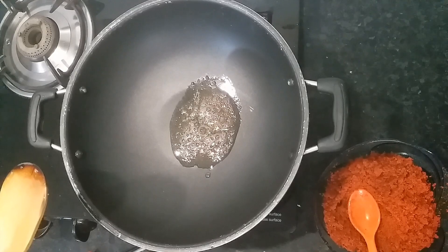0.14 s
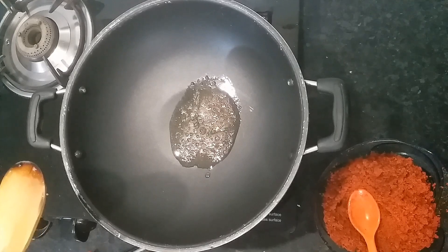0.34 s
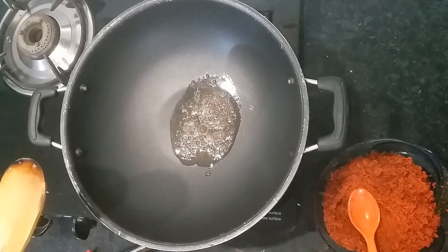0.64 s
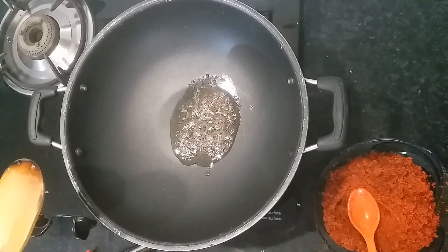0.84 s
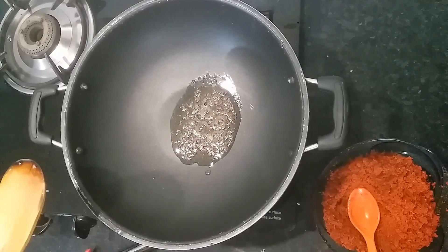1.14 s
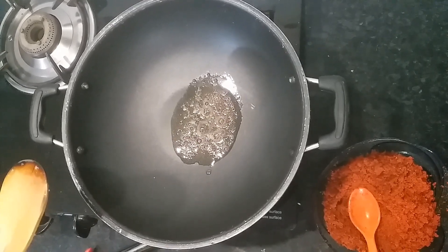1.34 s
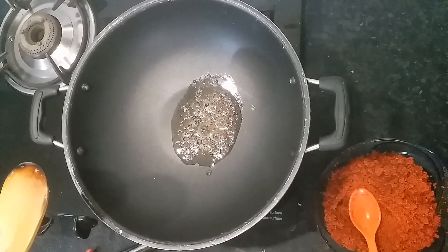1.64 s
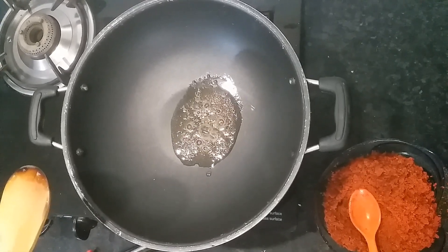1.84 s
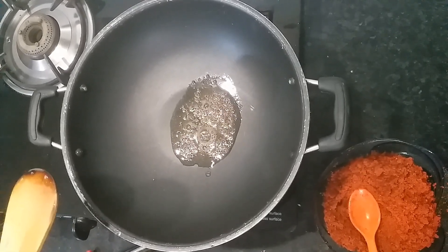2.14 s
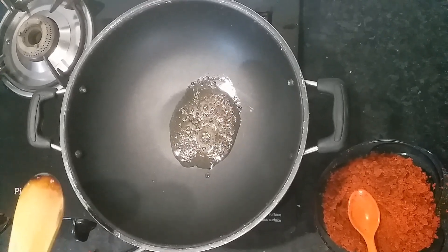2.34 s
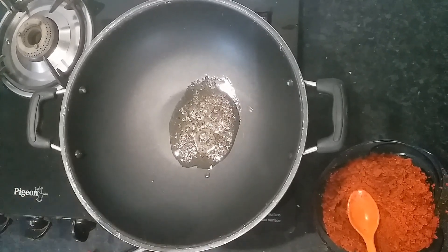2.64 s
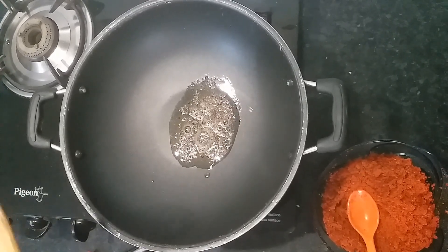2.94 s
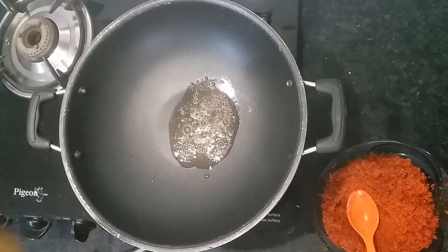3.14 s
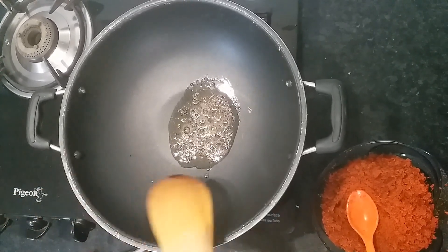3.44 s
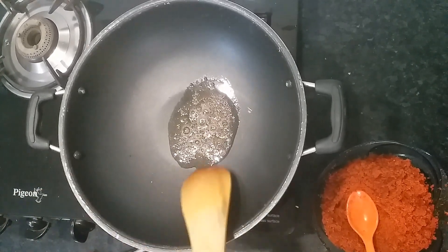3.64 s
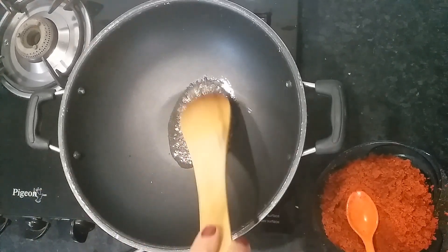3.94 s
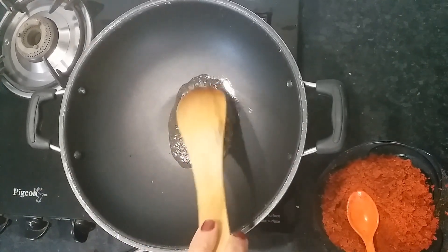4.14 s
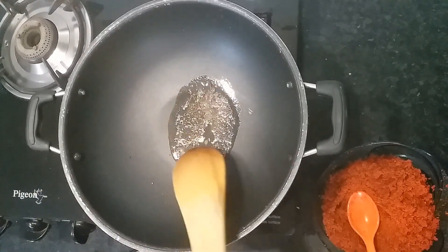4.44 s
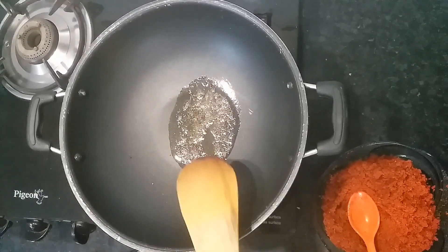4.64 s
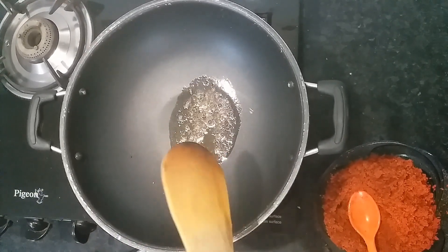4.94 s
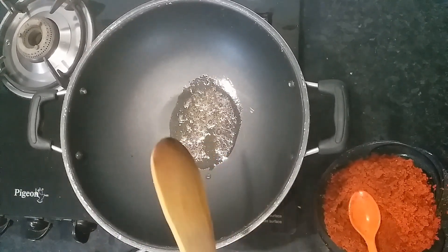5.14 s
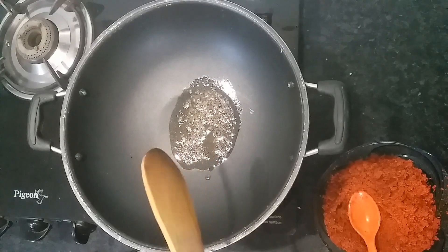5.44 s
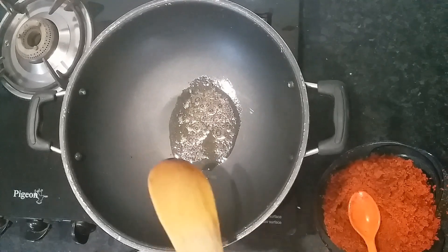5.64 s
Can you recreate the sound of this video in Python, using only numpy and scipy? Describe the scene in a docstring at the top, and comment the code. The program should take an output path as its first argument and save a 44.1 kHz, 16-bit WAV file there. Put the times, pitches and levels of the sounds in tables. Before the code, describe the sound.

Small seeds pop in hot oil in a metal wok, heard close from above in a hard-walled kitchen. The pops are sharp, bright and irregular, about eight a second, ranging from tiny ticks to loud snaps, each with a faint metallic ring and a short room echo. Strong ones land near 0.1, 0.7, 1.0, 1.1, 2.6, 3.0, 3.7 and 4.5 seconds. Underneath run a fine, quiet oil fizz, a low burner hum and a faint hiss. The fizz rises briefly around 2.1 seconds. From about 3.7 to 3.9 seconds a wooden spatula makes a quick cluster of dull knocks and short scrapes on the wok while the sizzle flares, then another knock and scrape near 4.35 seconds. The hum swells from about 4.7 seconds. After 5.1 seconds the pops thin out, with small surges of sizzle near 5.3 and 5.8 seconds.

```python
"""Seeds popping in a hot wok

Small seeds burst in a puddle of hot oil in a metal wok, heard from above in a hard-walled kitchen.
Each burst is a crack with its own short resonance; it rings the wok and the room. The oil fizzes finely,
a wooden spatula knocks and drags over the wok, and the burner hums low underneath."""
import sys
import numpy as np
from scipy import signal
from scipy.fft import rfft, irfft, next_fast_len
from scipy.io import wavfile
from scipy.ndimage import uniform_filter1d

SR = 44100
rng = np.random.default_rng(int(sys.argv[2]) if len(sys.argv) > 2 else 0)


def wrap_up_sound(samples):
    """Save the sound to the file named by the first command line argument, as 16-bit audio."""
    columns = np.atleast_2d(samples).T
    # keep every value between -1 and 1, then stretch to whole-number steps
    tamed = np.clip(columns, -1, 1)
    steps = np.round(tamed * 32767).astype(np.int16)
    wavfile.write(sys.argv[1], SR, steps)


N = 255339
TIME = np.arange(N) / SR
TAIL = 24576  # samples for one hit to ring out

# bursting seeds: start_s, crack_db, hull_hz, hull_width_hz, hull_db, overtone_share, wok_ring_db,
# room_db, pan_db (left minus right)
POPS = [(0.074, -5.5, 12310, 5400, 2, 0, -33, -6.5, 8), (0.111, -21, 4200, 2500, -12, 0, -24, -1.5, -3),
        (0.148, -29, 10600, 3100, -12, 0, -40, -3, -3), (0.311, -27, 8250, 700, -14, 0, -40, -21, 7),
        (0.4705, -20, 10000, 900, -13, 0, -31, -14, 2), (0.677, -2.5, 9900, 7000, -2, 0.2, -14, -0.5, 7),
        (0.904, -14.5, 12400, 2500, -8, 0, -23, -5.5, 16),
        (0.9448, -21, 3130, 3600, -6.5, 0, -33, -0.5, -2), (0.9487, -15, 8600, 1200, -4, .4, -17, 0.5, 12),
        (0.962, -1.5, 10400, 2500, 0, .5, -13.5, -10, 1), (1.1237, -12, 5100, 1630, 3, 0.16, -8, -0.5, -12),
        (1.125, -9.5, 3580, 1620, 15.5, 0, -14, -14.5, 0.5),
        (1.476, -18, 4770, 2100, 5.5, 0, -15.5, -11.5, 7), (1.7334, -17.5, 11700, 7000, -11, 0, -27, -7, 4),
        (1.9596, -9.5, 11300, 2300, -0.5, 0, -24, -6, 2), (2.0146, -20.5, 10800, 2300, -2.5, 0, -35, -3, 9),
        (2.109, -17.5, 8400, 1800, -9, .3, -28, -2.5, 7), (2.284, -21, 7960, 1520, -2, 0.33, -38, -5.5, 4),
        (2.365, -8.5, 12800, 4280, 3, 0, -21.5, -8, 0), (2.576, -2.5, 8900, 1400, 12.5, 0.2, -19, -6, 11),
        (2.6376, -15, 7000, 5000, -2, 0.15, -20.5, -7.5, 1), (2.7028, -6, 9400, 1900, 3, 0.7, -16, -3, 15),
        (2.889, -28, 5870, 5000, -16, 0, -36, -7.5, 2), (2.9282, -29, 13700, 3000, -7, 0.03, -35, -9, 17),
        (3.0332, -4, 12000, 6000, 0.5, 0, -25, -7.5, 14), (3.135, -24, 6700, 6500, -9.5, 0.1, -28, -4, 3),
        (3.1583, -20, 8870, 2000, -1.5, 0, -29, -5.5, 4), (3.294, -16.5, 3680, 1780, -4, 0, -20, -6.5, 22),
        (3.302, -20, 14000, 1500, -0.5, 0, -41, -6, 8), (3.3946, -18.5, 7300, 3000, -4, 0.36, -29, -0.5, 1),
        (3.4268, -18.5, 4320, 1400, -3, 0, -20, -9, -2), (3.5769, -6.5, 9960, 2660, 6, 0.6, -20, -4.5, 18),
        (3.714, -2.5, 5830, 4300, 5, 0, -19, -8.5, 5), (4.108, -23, 10800, 990, 2, 0, -28, -7, -3),
        (4.1099, -19.5, 5800, 800, 2.5, 0, -41.5, -12.5, 4),
        (4.311, -15.5, 12200, 7000, -3.5, 0.2, -24, -4, 4), (4.357, -11, 13700, 1500, -10, 0, -23, -6, 2),
        (4.494, -5, 4600, 1900, 7.5, 0, -5.5, -7.5, 5), (4.67, -20, 9400, 1300, -17, 0, -26.5, -8, 6),
        (4.7525, -12.5, 5030, 1800, -0.5, 0, -9, -5.5, 4),
        (4.762, -11.5, 4300, 700, 9.5, 0.26, -23, -8.5, 5), (4.833, -6, 2930, 3600, 0, 0.5, -30, -8, 2),
        (5.0063, -21.5, 5300, 1590, -11, 0, -24.5, -1.5, 3),
        (5.0166, -26, 10000, 2300, -6.5, 0, -38, -3, 10), (5.079, -7.5, 13200, 2780, 8, 0, -24, -8, 5),
        (5.144, -27, 12540, 3000, -6, 0, -33, -5, 6), (5.7266, -23, 4650, 1100, 4.5, 0.1, -20, -16, 4)]


def undb(db):
    """Decibels to gain."""
    return 10 ** (np.asarray(db) / 20)


def unit(x):
    """Scale to an energy of one in each channel."""
    return x / np.sqrt(np.sum(x ** 2, axis=-1, keepdims=True))


def level(x, db):
    """Scale to an rms level."""
    return x * undb(db) / np.sqrt(np.mean(x ** 2))


def shape(x, response):
    """Filter with a gain that is a function of frequency."""
    size = next_fast_len(x.shape[-1])
    hz = np.maximum(np.arange(size // 2 + 1) * SR / size, 1)
    return irfft(rfft(x, size) * response(hz), size)[..., :x.shape[-1]]


def colour(x, points):
    """Equalise along a curve of (freq_hz, gain_db) points."""
    hz, db = np.transpose(points)
    return shape(x, lambda f: undb(np.interp(np.log(f), np.log(hz), db)))


def resonance(f, hz, width):
    """A resonance applied twice, so that its skirts are steep."""
    return 1 / (1 + 2j * (f - hz) / width) ** 2


def stereo_noise(likeness, size=N):
    """Two channels of noise that share a part of their power."""
    common, *own = rng.standard_normal((3, size))
    return np.sqrt(likeness) * common + np.sqrt(1 - likeness) * np.array(own)


def fade(t60):
    """Exponential decay, down 60 dB after t60 seconds."""
    return np.exp(-np.log(1000) * np.arange(TAIL) / SR / t60)


def panned(x, db):
    """Share the power between the sides; positive leans left."""
    gains = undb(np.array([[db], [-db]]) / 2)
    return x * gains / np.sqrt(np.mean(gains ** 2))


def add(out, x, start_s):
    """Mix a sound in at a time."""
    start = int(start_s * SR)
    part = out[:, start:start + x.shape[-1]]
    part += x[:, :part.shape[-1]]


def room(low_t60=0.37, high_t60=0.17, early_t60=0.014, early_db=-9, grain_db=3):
    """Reflections from bowl and counter, then the kitchen's tail, whose treble dies first."""
    # echoes come in clumps, so the decay is grainy
    clumps = uniform_filter1d(rng.standard_normal((2, TAIL)), size=40, axis=-1)
    echoes = stereo_noise(likeness=0.014, size=TAIL) * undb(grain_db * level(clumps, 0))
    low = shape(echoes, lambda f: 1 / (1 + (f / 6000) ** 2))
    late = (low * fade(low_t60) + (echoes - low) * fade(high_t60)) * (1 - fade(0.0045))
    early = rng.standard_normal((2, TAIL)) ** 3 * fade(early_t60) * (1 - fade(0.043))
    return unit(unit(late) + undb(early_db) * unit(early))


def room_tone(level_db=-60):
    """The kitchen's faint, even hiss."""
    # hiss spectrum: freq_hz, gain_db
    spectrum = [(100, 9), (300, 7), (700, 6.5), (1200, 3), (2000, -5.5), (3200, -49), (6500, -13),
                (8700, -5), (11000, 2), (15500, -8.5)]
    hiss = colour(stereo_noise(likeness=0.32), spectrum)
    return panned(level(hiss, level_db), 0.5)


def drone(hz, width_hz, steadiness=0.37):
    """A resonance driven by noise, its wavering level partly evened out."""
    band = shape(rng.standard_normal(N), lambda f: resonance(f, hz, width_hz))
    tone = signal.hilbert(level(band, 0))
    return level(tone.real / (np.abs(tone) + 0.04) ** steadiness, 0)


def burner(rumble_db=-54, upper_db=-71, rumble_follows=0.46):
    """The flame's turbulence rumbles and keeps two low resonances humming."""
    # level ride of the hum: time_s, level_db
    ride = [(0, -52.5), (0.45, -57.5), (1.1, -54.5), (2.2, -53.5), (2.9, -58.5), (3.4, -53), (4.1, -53),
            (4.7, -47.5), (5.0, -44.5), (5.35, -42.5), (5.79, -46.5)]
    hum_db = np.interp(TIME, *np.transpose(ride))
    # flame rumble spectrum: freq_hz, gain_db
    spectrum = [(20, -34), (45, -58), (62, -1.5), (80, 4), (105, 4), (150, -2), (180, -8), (240, -6.5),
                (295, -6.5), (350, -12.5), (500, -23), (1000, -38)]
    rumble = level(colour(stereo_noise(likeness=0.92), spectrum), rumble_db)
    hum = drone(hz=123, width_hz=14) * undb(hum_db + 0.5)
    upper_hum = drone(hz=295, width_hz=20) * undb(upper_db)
    swell = undb(rumble_follows * (hum_db - np.mean(hum_db)))
    return hum + swell * (rumble + upper_hum)


def crack(t60, rise_s=0.00043):
    """A sharp burst with an even spectrum, scattered differently to each side by the bowl."""
    t = TIME[:256]
    envelope = np.exp(-np.log(1000) * t / t60) * (1 - np.exp(-(t / rise_s) ** 2))
    spectrum = rfft(stereo_noise(likeness=0.23, size=len(t)) * envelope)
    power = uniform_filter1d(np.abs(spectrum) ** 2, size=13, axis=-1)
    even = unit(irfft(spectrum / np.sqrt(power)))
    return np.pad(even, ((0, 0), (0, TAIL - len(t))))


def boiling(simmer_db=-57.5, splash_db=-50, splash_fade_s=0.24, spurt_db=0.5, spurt_hz=9):
    """Strength of the fizz: a simmer in small spurts that rises with each seed's splash and with flares."""
    # the oil flares up, mostly where it is stirred: middle_s, width_s, rise_db
    flares = [(0.14, 0.57, 0.5), (2.088, 0.18, 11), (3.8, 0.34, 16.5), (4.34, 0.25, 9), (5.303, 0.23, 11.5),
              (5.762, 0.33, 11.5)]
    flare_db = sum(db * np.exp(-(2 * (TIME - s) / width) ** 2) for s, width, db in flares)
    splash_power = np.zeros(N)
    for start_s, crack_db, *_ in POPS:
        settling = (TIME > start_s) * np.exp(-np.abs(TIME - start_s) / splash_fade_s)
        splash_power += undb(crack_db + splash_db) ** 2 * settling
    spurts = level(shape(rng.standard_normal(N), lambda f: np.exp(-(f / spurt_hz) ** 2)), 0)
    return np.sqrt(undb(simmer_db + flare_db) ** 2 + splash_power) * undb(spurt_db * spurts)


def oil(bubbles_per_s=900, spots=6, size_spread_db=3, tint_spread_db=2):
    """Tiny steam bubbles burst across the puddle: most are faint, a few tick; each spot has its tint."""
    # fizz spectrum: freq_hz, gain_db
    spectrum = [(300, 6), (700, -5.5), (1200, -4.5), (2100, 3.5), (3000, 1), (4400, 0), (6500, -1.5),
                (8700, 0), (12000, -5.5), (16000, 2.5)]
    fizz = np.zeros((2, N))
    for _ in range(spots):
        sizes = undb(size_spread_db * np.minimum(rng.exponential(size=N), 5))
        bubbles = (rng.random(N) < bubbles_per_s / spots / SR) * sizes * rng.choice([-1, 1], N)
        tint = [(hz, db + tint_spread_db * rng.standard_normal()) for hz, db in spectrum]
        tick = colour(panned(crack(t60=0.0041), 3.3) + room(), tint)[:, :TAIL // 2]
        fizz += signal.fftconvolve(bubbles[None], tick, axes=1)[:, :N]
    return level(fizz, 0) * boiling()


def wok(damping_t60, scatter_db=0, walls_db=-2, detune=0.0025):
    """The wok's modes, struck at a new spot each time; whatever touches the metal shortens the ring."""
    # modes of the metal bowl: pitch_hz, level_db, t60_s
    modes = [(603, -19.5, 0.3), (727, -23, 0.13), (1604, -27, 0.27), (1793, -19, 0.12), (2116, -2.5, 0.16),
             (2140, -6.5, 0.12), (2170, -7.5, 0.16), (2630, -9, 0.18), (3153, -10, 0.91),
             (3290, -13.5, 0.51), (4160, -9.5, 0.46), (4330, -10, 0.2), (4760, -13, 0.23),
             (5540, -6.5, 0.15)]
    hz, db, t60 = np.transpose(modes)
    pitch_hz = hz * (1 + detune * rng.standard_normal(len(hz)))
    partials = np.exp(np.outer(2j * np.pi * pitch_hz - np.log(1000) / t60, TIME[:TAIL]))
    gains = undb(db + scatter_db * rng.standard_normal((2, len(hz))))
    phases = np.exp(2j * np.pi * rng.random((2, len(hz))))
    ring = ((gains * phases) @ partials).real
    # the ring arrives both straight and by way of the walls
    walls = signal.fftconvolve(ring * fade(0.071), room(), axes=1)[:, :TAIL]
    return unit(unit(ring * fade(damping_t60)) + undb(walls_db) * unit(walls))


def wood_on_wok(soft_hz=3200):
    """The wok's ring under soft wood, which misses the high modes and damps the rest."""
    return unit(shape(wok(damping_t60=0.11), lambda f: 1 / (1 + 1j * f / soft_hz) ** 2))


def stick_slip(slips_per_s=900, grain=0.1188, edge_s=0.035):
    """Grains of friction from the dragging blade; each stroke presses on, holds and lifts off."""
    # spatula strokes: start_s, length_s, friction_db
    strokes = [(3.672, 0.07, -52), (3.794, 0.065, -44), (4.32, 0.053, -50)]
    pressure = np.zeros(N)
    for start_s, length_s, friction_db in strokes:
        corners_s = start_s + np.array([0, edge_s, length_s, length_s + edge_s])
        pressure += undb(friction_db) * np.interp(TIME, corners_s, [0, 1, 1, 0])
    slips = (rng.random(N) < slips_per_s / SR) * rng.standard_normal(N)
    slips *= np.exp(grain * rng.standard_normal(N))
    return level(slips, 0)[None] * pressure


def spatula(blow_t60=0.025, room_db=-4, scrape_db=3.5, scrape_ring_db=-5):
    """Dull knocks and short scrapes sound the wooden blade and ring the wok."""
    # spatula meeting the wok: start_s, blow_db, wok_ring_db
    knocks = [(3.6854, 1, -4.5), (3.7362, -6.5, -30), (3.7692, -14, -16), (3.7918, -17, -7),
              (3.8070, -10, -20), (3.8380, -17, -12), (3.8602, -8, -12), (4.351, -5.5, -11),
              (4.3543, -9, -12)]
    # resonances of wood against metal: pitch_hz, width_hz, level_db
    wood_modes = [(425, 330, -1), (726, 640, -2), (1140, 450, -21), (1740, 310, 2.5), (2430, 570, 1.5),
                  (3520, 830, -4.5)]

    def wood(f):
        return np.sqrt(sum(np.abs(undb(db) * resonance(f, hz, width)) ** 2
                           for hz, width, db in wood_modes))

    contact, rings = np.zeros((2, 2, N))
    for start_s, blow_db, ring_db in knocks:
        blow = unit(stereo_noise(likeness=1, size=TAIL) * fade(blow_t60))
        add(contact, undb(blow_db + 2) * (blow + undb(room_db) * room()), start_s)
        add(rings, undb(ring_db) * wood_on_wok(), start_s)
    slips = stick_slip()
    contact += undb(scrape_db) * signal.fftconvolve(slips, crack(t60=0.011) + room(), axes=1)[:, :N]
    rings += undb(scrape_ring_db) * signal.fftconvolve(slips, wood_on_wok(), axes=1)[:, :N]
    return panned(shape(contact, wood), 2.4) + rings


def seeds(overtone_ratio=1.53, tilt_db_per_octave=1.5, bass_knee_hz=600, beam_db_per_khz=-0.4):
    """Steam splits a hull: a broad crack, a short resonance and its overtone ring the wok and the room."""
    # tone of the kitchen's reflections: freq_hz, gain_db
    room_colour = [(100, 12), (400, 6.5), (1000, 2), (4000, 8), (9000, 7), (16000, 7.5)]
    out = np.zeros((2, N))
    for start_s, crack_db, hz, width, hull_db, overtone, ring_db, room_db, pan_db in POPS:
        def burst(f, hull_trim_db=0):
            split = undb(crack_db + tilt_db_per_octave * np.log2(np.maximum(f, 1500) / 5000))
            peaks = resonance(f, hz, width) + overtone * resonance(f / overtone_ratio, hz, width)
            hull = undb(hull_db + hull_trim_db) * peaks
            phase = np.exp(1j * np.angle(split + hull))
            low_cut = 1 / (1 + bass_knee_hz / (1j * f))  # so small a source radiates little bass
            return np.hypot(split, np.abs(hull)) * phase * low_cut

        direct = shape(panned(crack(t60=0.0078), pan_db), burst)
        # the bowl beams a high resonance upwards, so less of it reaches the walls
        beamed_db = beam_db_per_khz * hz / 1000
        walls = shape(colour(room(), room_colour), lambda f: burst(f, beamed_db))
        # oil damps the wok; modes near the hull's resonance are struck hardest
        ring = unit(shape(wok(damping_t60=0.36), lambda f: np.abs(burst(f)) ** 0.23))
        pop = direct + undb(room_db) * walls + undb(ring_db + 2) * ring
        add(out, pop[:, :TAIL - TAIL // 10], start_s)
    return out


def scene():
    """Pops and spatula up front, over a bed of fizz, flame and room tone."""
    return seeds() + spatula() + oil() + burner() + room_tone()


def record(dry, top_hz=15700):
    """Two microphone ports colour left and right differently, and the top is cut."""
    # tone of the ports: freq_hz, left_db, right_db
    ports = [(101, -2, -2), (640, 3.1, 2.3), (1790, 1.5, 1.5), (2260, -1.5, 2.5), (3270, -2.5, -2),
             (4300, -3.5, 0), (5630, -3, -2.5), (7140, -6.5, 0), (8020, 1.5, -7), (9700, -1.06, -2),
             (13300, 0.5, -2.5), (15500, -5, -3.5)]
    left = colour(dry[0], [(hz, db) for hz, db, _ in ports])
    right = colour(dry[1], [(hz, db) for hz, _, db in ports])
    high_cut = signal.ellip(10, 0.2, 70, top_hz, fs=SR, output="sos")
    return signal.sosfilt(high_cut, [left, right])


dry = scene()
out = record(dry)
wrap_up_sound(out)
```